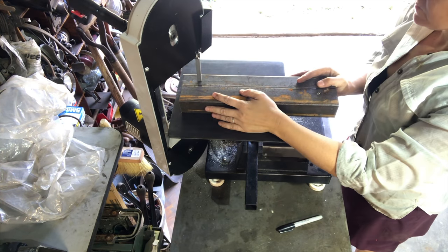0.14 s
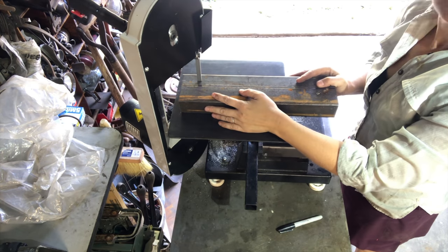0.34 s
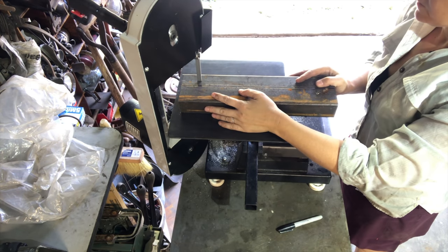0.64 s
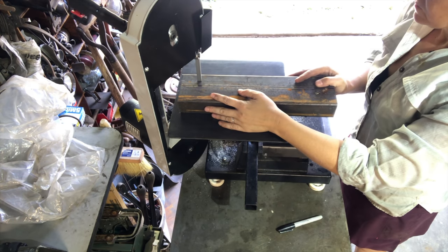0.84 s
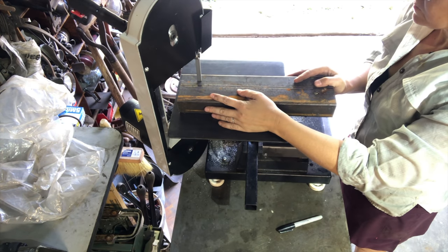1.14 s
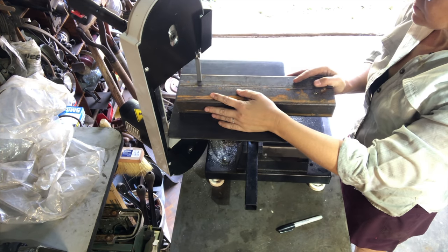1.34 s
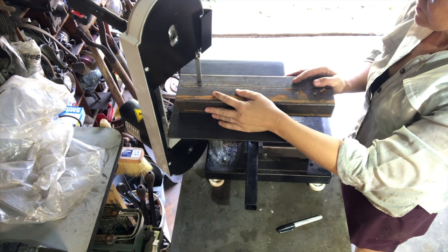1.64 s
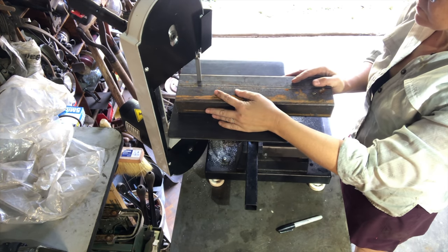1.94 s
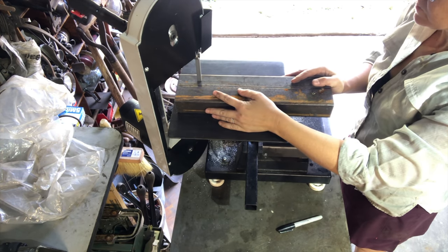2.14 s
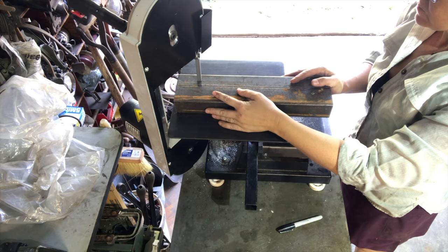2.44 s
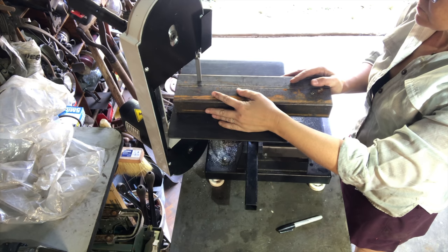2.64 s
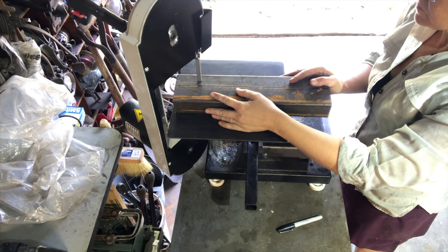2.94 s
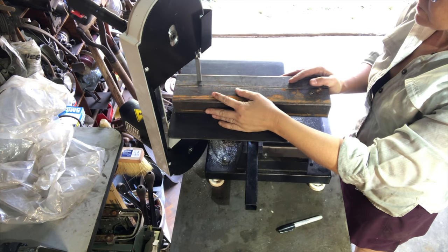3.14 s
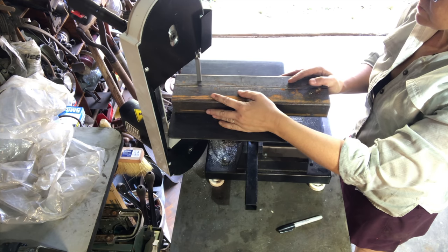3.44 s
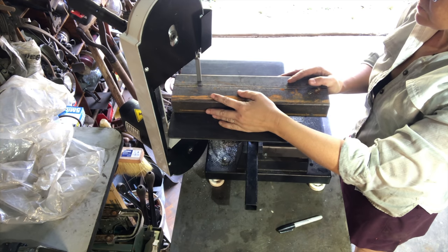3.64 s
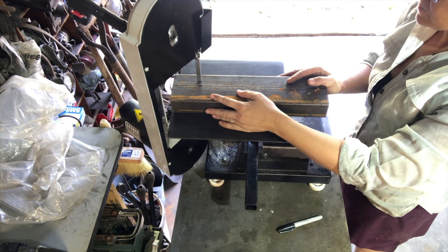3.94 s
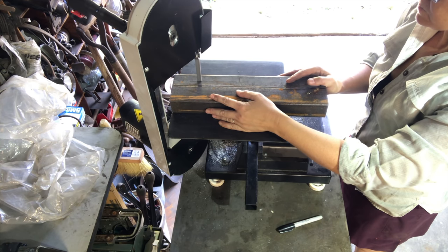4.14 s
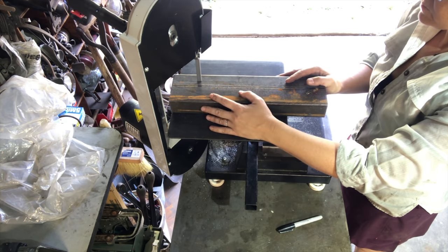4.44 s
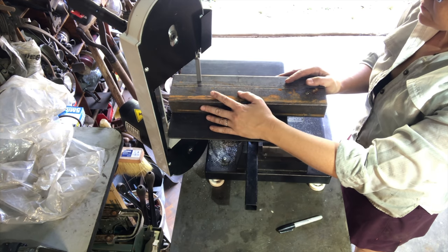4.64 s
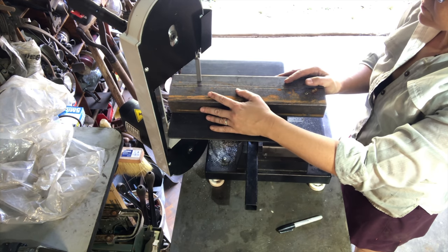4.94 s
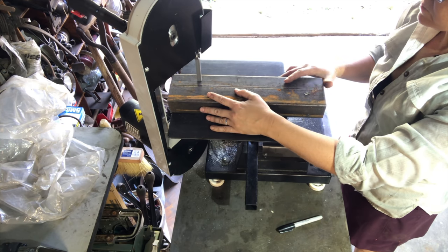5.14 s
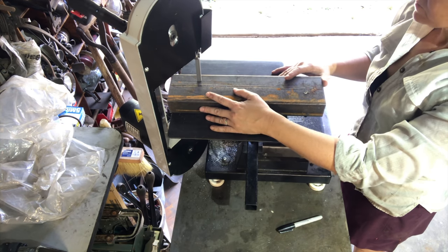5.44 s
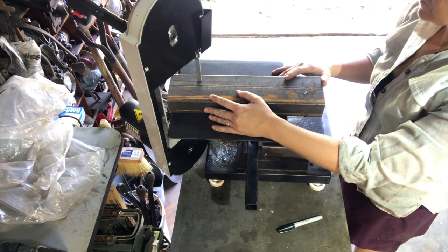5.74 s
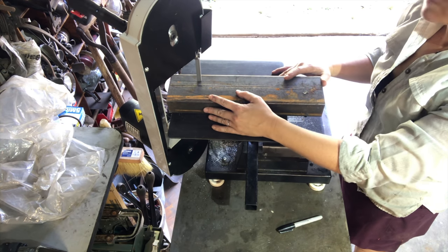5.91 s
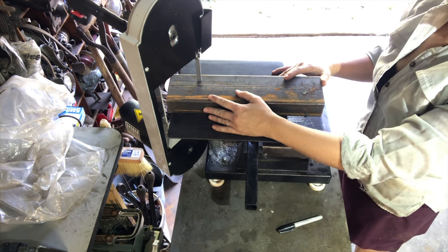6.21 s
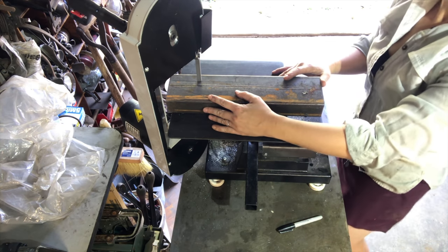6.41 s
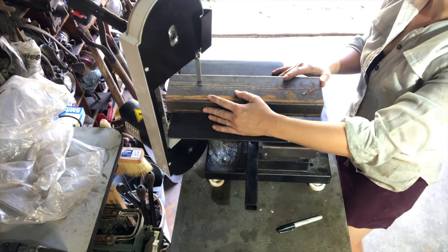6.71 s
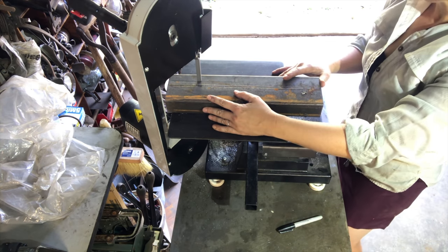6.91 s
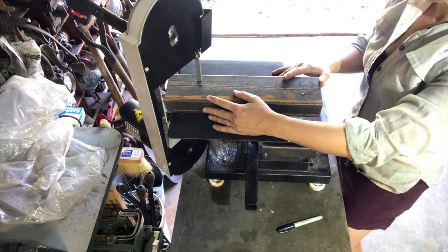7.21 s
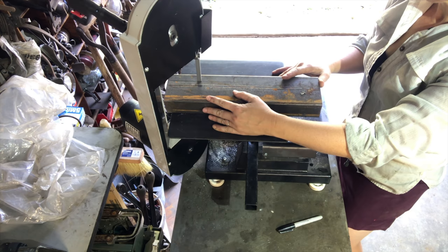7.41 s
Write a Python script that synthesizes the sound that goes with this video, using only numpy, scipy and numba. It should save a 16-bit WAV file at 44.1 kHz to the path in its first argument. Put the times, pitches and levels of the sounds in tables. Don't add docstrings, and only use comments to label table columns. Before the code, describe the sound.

A bandsaw is already biting into a steel tube, heard close in a small reverberant workshop. Bright gritty rasping and a piercing blade ring pulse about five times a second as the blade joint catches. A clean gear whine runs underneath, while the tube's squeal slowly drops in pitch. The feed briefly eases just after five seconds, then cutting resumes to the end. Thin, treble-heavy phone sound with almost no bass.

```python
import sys
import numpy as np
from scipy import signal
from scipy.fft import rfft, irfft
from scipy.io import wavfile
from scipy.ndimage import uniform_filter1d
from numba import njit

SR = 44100
rng = np.random.default_rng(int(sys.argv[2]) if len(sys.argv) > 2 else 0)


def volts_from_db(level):
    exponent = np.asarray(level, float) / 20
    return 10 ** exponent


def wav_out(sig):
    wavfile.write(sys.argv[1], SR, np.round(np.clip(np.atleast_2d(sig).T, -1, 1) * 32767).astype(np.int16))


N = 333837
t = np.arange(N) / SR

# (time [s], pressure as hiss level [dB], blade ring offset [dB], extra catch of the weld [dB])
FEED = [(0.0, -35, 3, 19), (0.35, -33.5, -3.5, 8), (0.69, -32.5, -2.8, 1.5), (1.3, -32, -1, -0.5),
        (1.75, -33, 0.5, 4.5), (2.46, -34, 0, 5), (2.8, -33, 3, 1), (3.4, -33.5, .1, 4.5),
        (4.2, -34, 3.5, 2), (4.45, -33.5, -2, 1.5), (5.14, -31.5, -0.5, 7.5), (5.5, -32.5, -.5, 5),
        (5.9, -30, -5, 2.5), (6.45, -32, 0.5, 9), (7.0, -31, 0.5, 2), (7.57, -32, -8, 7)]
# (time [s], half length [s], change of pressure [dB])
JERKS = [
    (0.414, 0.016, -3.5),
    (0.606, 0.018, -1.5),
    (5.165, 0.017, -4),
    (5.233, 0.018, -6.5),
    (5.275, 0.023, 1),
    (5.333, .015, -1.5),
    (5.402, 0.026, -4),
    (5.512, .02, 1),
    (5.539, 0.016, -2.5),
    (5.595, 0.013, -1.5),
]
# (time [s], length of the change [s])
SHIFTS = [
    (2.65, .03),
    (4.705, .02),
    (5.22, 0.12),
    (6.4, 1),
]

# (time [s], gear mesh rate [Hz])
MESH_RATE = [(0.0, 1271.4), (0.12, 1325.2), (0.3, 1340.0), (0.65, 1371.5), (1.25, 1358.8), (2.1, 1372.2),
             (2.4, 1368.4), (3.9, 1368.7), (4.5, 1373.5), (5.1, 1373.5), (5.4, 1385.3), (5.7, 1383.0),
             (6.0, 1376.1), (6.6, 1388.7), (7.1, 1376.6), (7.57, 1375.6)]
LOOP_MESHES, GROUP_MESHES = 262.72, 6.028
# (place in the loop [0-1], level over the worn teeth [dB])
PROUD_TEETH = [(.055, 0), (.165, 8), (.27, 9.5), (.34, 3.5), (.40, 8.5), (.495, 9), (.54, 4), (0.611, 8.5),
               (.655, 7), (.77, 6), (0.867, 4), (.892, 8), (0.913, 6.5)]
WORN_DB, PROUD_SPAN = -5, .017
JOINT_AT, JOINT_SPAN = .903, .022
CATCH_SCATTER_DB = 0.25

# (midway frequency [Hz], sinking [Hz/s], width [Hz], level in each
# of 5 stages [dB])
BODY = [(1657, -9, 16, -11, -6, -22, -7, -13), (2210, 2, 200, -10.5, -18, -10, -9.5, -11),
        (2275, -1.5, 19, -16.5, -15.5, -10, -11.5, -8.5), (2070, 2, 120, -14.5, -16.5, -32, -21, -17),
        (2507, 2, 29, -31, -16.5, -12, -17, -17), (3450, -46, 220, -11.5, -8, -16, -17, -9.5),
        (3963, 41, 75, -2.5, -3, -4.5, -5, -23), (4440, -16, 93, -8, -4.5, -27, -13, -14),
        (6500, 13, 400, -21, -35, -18, -29, -29), (6860, 216, 34, -11, -16.5, -30, -32, -33),
          (8147, 46, 71, -10, -12.5, -4.5, -6, -2), (9170, -8, 220, -29, -14.5, -21, -14, -9),
          (9700, 31, 480, -9, -7.5, -8, -15, -15), (10665, 47, 120, -33, -20, -16, -5, -1),
          (11330, 54, 490, -15, -5, -11, -20, -34), (13000, 150, 80, -34, -21, -30, -30, -29),
          (12450, 7, 163, -26, -3.5, -22, -27, -29), (12800, 18, 90, -29, -18, -24, -20, -29),
          (14100, 30, 250, -12, -18, -20, -22, -24)]
# (frequency [Hz], early, middle and late level [dB per Hz])
RASP = [(970, -85, -54, -57), (1170, -50.5, -43, -51), (1880, -38, -71, -38.5), (2430, -37.5, -40, -41.5),
        (3000, -42.5, -46.5, -42), (3350, -38, -38, -33), (4730, -36.5, -34, -39),
        (5500, -33.5, -37, -39.5), (6730, -38, -47.5, -42), (9900, -44.5, -40, -39.5),
        (11400, -48.5, -42, -56), (13200, -39.5, -39.5, -50), (15500, -50, -49.5, -54),
        (16800, -64, -62, -69)]
COMB = [7, 8, 9, 10, 11, 16, 19, 20, 21, 22, 23, 24, 27, 30, 32, 34]
COMB_DB = [(-6.5, -7.5, -1.5, -6.5, -19), (-15, -61, -31, -20, -17), (-12, -12.5, -8.5, -11, -12),
           (-7, -12, -11, -8, -8), (-9, -23, -21, -32, -20), (-12.5, -15, -24, -17, -21),
           (-17, -11.5, -15, -8.5, -14), (-14, -11, -9, -13, -2.5), (-2.5, -21, -24, -24, -34),
           (-0.5, -7.5, -24, -9, -29), (0, -6.5, -5.5, -16, -13), (-4, -10, -10.5, -16, -18),
           (-11, -24, -24, -31, -41), (-15, -24, -28, -24, -17), (-12, -24, -28, -48, -46),
           (-14, -24, -26, -26, -26)]

# (frequency [Hz], width [Hz], level [dB])
BLADE_MODES = [
    (5023, 190, 6),
    (5177, 83, -4),
    (5900, 210, -30),
]
# (time [s], frequency [Hz])
SING_HZ = [(0, 5056), (.45, 5146), (.65, 5147), (5.0, 5187), (5.6, 5310), (7.57, 5070)]
RING_DB, SING_DB = [-1.5, -2, -2, -8, -19], [0.5, 1.5, -4, -6.5, -9]
SING_LIMIT_DB = 14.5
WHINE_DB, WHINE_RISE_DB, WHINE_RISE_S = [-42, -42.5, -42, -39, -38], 11, 0.11

# (time [s], frequency [Hz], width [Hz])
WALL = [(0, 1940, 40), (.65, 2045, 30), (1.05, 2040, 30), (1.5, 2020, 30), (2.0, 1930, 50), (2.6, 1855, 50),
        (2.85, 1815, 25), (3.3, 1795, 30), (3.8, 1735, 50), (4.3, 1672, 32), (5.12, 1640, 24),
        (5.2, 1605, 28), (5.9, 1592, 32), (6.1, 1550, 45), (6.7, 1525, 35), (7.57, 1490, 30)]
# (time [s], level [dB])
WALL_DB = [(0.0, -41), (0.55, -37), (0.95, -32), (1.28, -23.5), (1.56, -33.5), (2.2, -29.5), (2.75, -35),
           (3.0, -26), (3.45, -33.5), (3.7, -33.5), (4.1, -30.5), (4.4, -26), (5.0, -23), (5.5, -24.5),
           (5.95, -30), (6.2, -30), (7.1, -29.5), (7.57, -38)]
WALL_PER_JERK = 3
FLUTTER_DB_PER_HZ, FLUTTER_RATE_HZ, STEADY_HZ = 0.1274, 25, 22.5

# (frequency [Hz], level [dB per Hz])
MOTOR = [(30, -122), (110, -112), (160, -101), (230, -85.5), (300, -84), (420, -87.5), (550, -87),
         (680, -88), (1000, -92), (1500, -87)]
# (frequency [Hz], level [dB])
HUM = [
    (123.8, -85),
    (409.1, -69.5),
    (532.9, -69),
]
RATTLE_HZ, RATTLE_WIDTH_HZ, RATTLE_DB = 757, 240, [-69, -60, -72, -72, -71]

# (middle time [s], half length [s], frequency
# [Hz], rise [Hz/s], level [dB])
SQUEAKS = [
    (0.025, 0.056, 15480, 5000, -44),
    (.088, .012, 15700, 0, -40),
    (0.131, 0.019, 5080, 2, -27),
    (.182, 0.014, 2210, 0, -27.5),
    (0.175, 0.016, 4440, 0, -26),
    (0.211, 0.0073, 2160, 0, -34),
    (2.658, 0.0098, 1384, 0, -33),
    (4.519, 0.22, 4580, 0, -35.5),
    (4.706, 0.0043, 1380, 0, -31),
]
# (time [s], level [dB])
THUMPS = [
    (0.155, -72),
    (2.659, -68),
    (3.428, -68),
    (3.619, -81),
    (4.005, -63),
    (4.958, -87),
    (5.344, -71),
    (5.914, -91),
    (6.674, -62),
    (7.242, -60),
]
SHOP_T60_S, SHOP_DB = 0.47, -11.5


def unit(x):
    return x / np.sqrt(np.mean(x ** 2))


def curve(rows):
    s, *columns = np.transpose(rows)
    return [np.interp(t, s, c) for c in columns]


def staged(values):
    s = np.ravel([(at - span / 2, at + span / 2) for at, span in SHIFTS])
    return np.interp(t, s, np.repeat(values, 2)[1:-1])


def walk(rate):
    k = int(SR / rate)
    held = np.repeat(rng.standard_normal(N // k + 1), k)
    return 1.106 * uniform_filter1d(uniform_filter1d(held, k), k)[:N]


def colour(x, hz, db):
    f = np.arange(N // 2 + 1) * SR / N + 1
    gain = volts_from_db(np.interp(np.log(f), np.log(hz), db))
    return irfft(rfft(x) * gain * np.sqrt(SR / 2), N)


@njit
def svf(x, hz, width):
    y, b, l = np.empty(len(x)), 0., 0.
    for i in range(len(x)):
        g, k = np.tan(np.pi * hz[i] / SR), width[i] / hz[i]
        v = (b + g * (x[i] - l)) / (1 + g * (g + k))
        b, l, y[i] = 2 * v - b, l + 2 * g * v, k * v
    return y


def resonate(x, hz, width):
    return svf(x, hz + 0 * t, width + 0 * t) * np.sqrt(SR / (np.pi * width))


def sing(hz, wander_hz, rate):
    return np.sqrt(2) * np.sin(2 * np.pi * np.cumsum(hz + wander_hz * walk(rate)) / SR)


def chips(loop, memory, grain_db):
    size = int(SR * LOOP_MESHES / MESH_RATE[-1][1])
    fresh = rng.standard_normal((int(loop[-1]) + 1, size))
    worn = signal.lfilter([1], [1, -np.clip(memory, 0, .95)], fresh, axis=0).ravel()
    grain = volts_from_db(grain_db * rng.exponential(size=N))
    return unit(worn[(loop * size).astype(int)] * grain)


def bite(loop, catch_db):
    place = loop % 1
    wear = WORN_DB + sum(db * np.exp(-((place - at) / PROUD_SPAN) ** 2) for at, db in PROUD_TEETH)
    joint = np.exp(-((place - JOINT_AT) / JOINT_SPAN) ** 2)
    scatter = CATCH_SCATTER_DB * rng.standard_normal(int(loop[-1]) + 1)[loop.astype(int)]
    return wear + joint * (catch_db + scatter)


def cut(mesh, bite_db):
    loop = mesh / LOOP_MESHES
    shake = chips(loop, memory=0.46, grain_db=2.0) * volts_from_db(0.5 * bite_db + 1.4 * walk(40))
    body = 0
    for hz, sink, width, *db in BODY:
        body = body + volts_from_db(staged(db)) * resonate(shake, hz - sink * (t - t[-1] / 2), width)

    scrape = chips(loop, memory=0.071, grain_db=2.5) * volts_from_db(0.33 * bite_db + 1.7 * walk(60))
    hz, *spectra = np.transpose(RASP)
    shares = np.eye(3)[[0, 1, 2, 2, 2]].T
    rasp = sum(staged(share) * colour(scrape, hz, db) for share, db in zip(shares, spectra))

    groups = mesh / GROUP_MESHES + 0.007 * walk(45)
    comb = 0
    for k, db in zip(COMB, COMB_DB):
        line = np.sin(2 * np.pi * (k * groups + k * 0 + rng.random()))
        comb = comb + volts_from_db(staged(db) + .8 * walk(15)) * line
    seating_db = -10.6 * np.exp(-t / 0.24)
    return body + rasp + np.sqrt(2) * comb * volts_from_db(0.27 * bite_db + seating_db)


def blade_span(loop, bite_db):
    shake = chips(loop, memory=0.5, grain_db=2.5)
    ring = sum(volts_from_db(db) * resonate(resonate(shake, hz, 2 * width), hz, width) for hz, width, db in BLADE_MODES)
    song = sing(curve(SING_HZ)[0], wander_hz=26, rate=110) * volts_from_db(1.2 * walk(90))
    ring_db = staged(RING_DB) + 0.42 * bite_db
    song_db = staged(SING_DB) + np.minimum(1.78 * bite_db, SING_LIMIT_DB)
    return unit(ring) * volts_from_db(ring_db) + song * volts_from_db(song_db)


def whine(mesh):
    db = staged(WHINE_DB) - WHINE_RISE_DB * np.exp(-t / WHINE_RISE_S)
    return np.sqrt(2) * volts_from_db(db + 0.5 + .5 * walk(14)) * np.sin(2 * np.pi * mesh)


def wall(mesh):
    hz, width = curve(WALL)
    flutter_db = FLUTTER_DB_PER_HZ * np.maximum(width - STEADY_HZ, 0) * walk(FLUTTER_RATE_HZ)
    db = curve(WALL_DB)[0] + WALL_PER_JERK * jerks() + flutter_db
    shake = chips(mesh / LOOP_MESHES, memory=0.76, grain_db=0.5)
    skirt = unit(resonate(resonate(shake, hz, 3 * width), hz, 2.0 * width))
    squeal = sing(hz, wander_hz=.25 * width, rate=30) * volts_from_db(1.5 * walk(35))
    lines = sum(np.sqrt(2) * np.sin(2 * np.pi * k * mesh / GROUP_MESHES) for k in (7, 8, 9))
    capture_hz = 110 + 0 * t
    locked = svf(svf(lines, hz, capture_hz), hz, capture_hz)
    free = 1 - np.clip(0.61 * uniform_filter1d(locked ** 2, size=2000), 0, .8)
    return volts_from_db(db) * (volts_from_db(-6) * free * squeal + volts_from_db(-10.0) * skirt + volts_from_db(-3.5) * locked)


def motor():
    rumble_db = staged([-1.1, 0.9, -2.4, 0.6, 0.0]) + 1.3 * walk(3.28)
    rumble = colour(rng.standard_normal(N), *np.transpose(MOTOR)) * volts_from_db(rumble_db)
    buzz = resonate(rng.standard_normal(N), RATTLE_HZ, RATTLE_WIDTH_HZ)
    buzz = unit(resonate(buzz, RATTLE_HZ, RATTLE_WIDTH_HZ)) * volts_from_db(staged(RATTLE_DB) + 0.83 * walk(5.7))
    hum = sum(volts_from_db(db + 0.5 * walk(6)) * sing(hz, wander_hz=.004 * hz, rate=9) for hz, db in HUM)
    return rumble + buzz + hum


def squeaks():
    total = 0
    for s, half, hz, rise, db in SQUEAKS:
        since = t - s
        tone = np.sin(2 * np.pi * (hz + rise * since / 2) * since)
        total = total + np.sqrt(2) * volts_from_db(db) * np.exp(-(since / half) ** 2) * tone
    return total


def thumps():
    return sum(volts_from_db(db) * np.exp(-((t - s - .025) / 0.002) ** 2) for s, db in THUMPS)


def jerks():
    return sum(db * np.exp(-((t - s) / half) ** 2) for s, half, db in JERKS)


def reverberation(dry_saw):
    tail = np.arange(SR // 2) / SR
    echo = rng.standard_normal(len(tail)) * volts_from_db(-60 * tail / SHOP_T60_S) * (tail > .004)
    return signal.fftconvolve(dry_saw, echo / np.sqrt(np.sum(echo ** 2)))[:N]


def scene():
    mesh = np.cumsum(curve(MESH_RATE)[0]) / SR
    loop = mesh / LOOP_MESHES
    feed_db, ring_db, catch_db = curve(FEED)
    bite_db = bite(loop, catch_db)
    saw = volts_from_db(feed_db + jerks()) * (cut(mesh, bite_db) + volts_from_db(ring_db) * blade_span(loop, bite_db))
    saw = saw + whine(mesh) + wall(mesh) + squeaks()
    saw = .6 * np.tanh(saw / .6)
    bass_cut = signal.butter(4, 900, "high", fs=SR, output="sos")
    radiated = signal.sosfilt(bass_cut, saw + volts_from_db(SHOP_DB) * reverberation(saw))
    return (radiated + motor() + thumps())[None]


def roll_off(x):
    return signal.sosfilt(signal.butter(12, 16130, fs=SR, output="sos"), x)


def record(dry):
    top = signal.ellip(16, .2, 80, 15730, fs=SR, output="sos")
    mix = signal.sosfilt(top, dry)
    return roll_off(mix)


dry = scene()
out = record(dry)
wav_out(out)
```